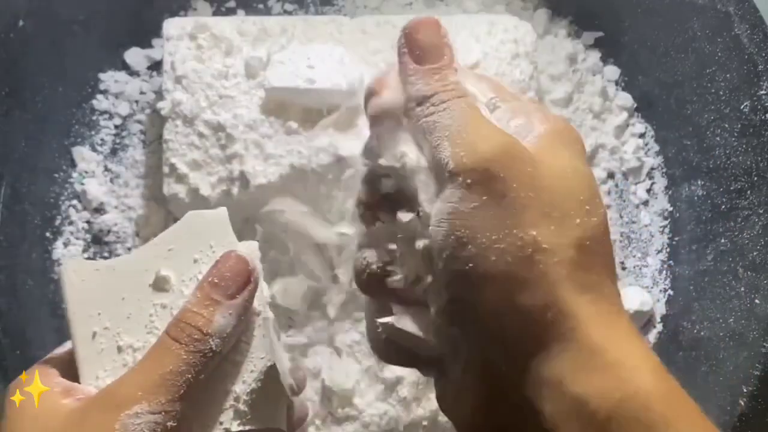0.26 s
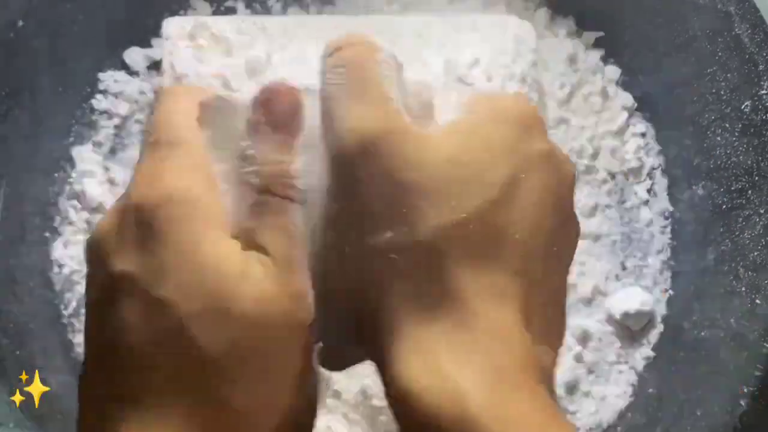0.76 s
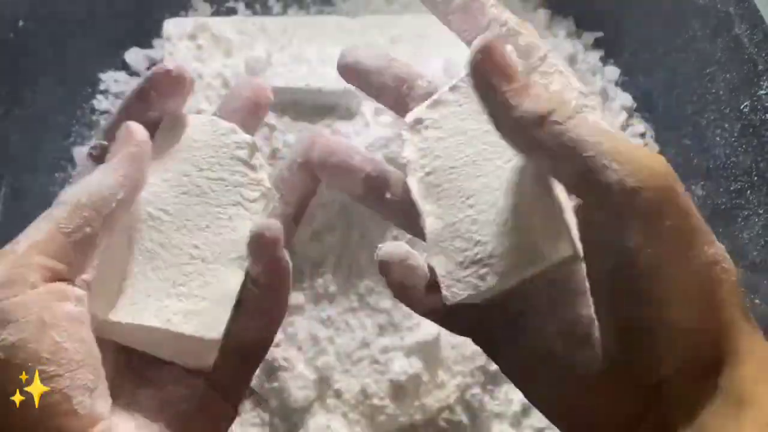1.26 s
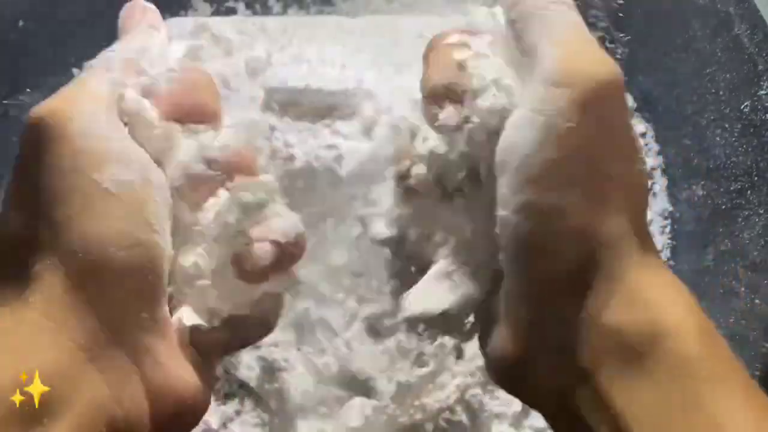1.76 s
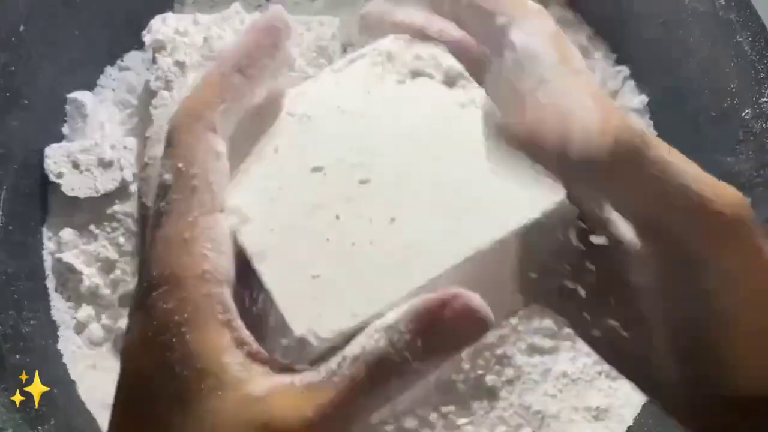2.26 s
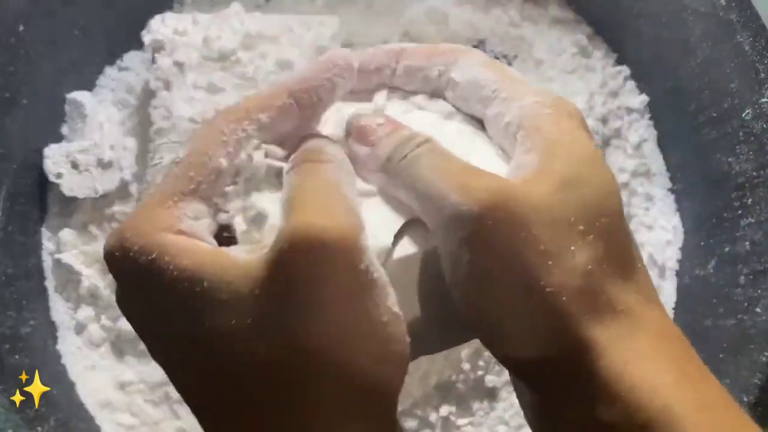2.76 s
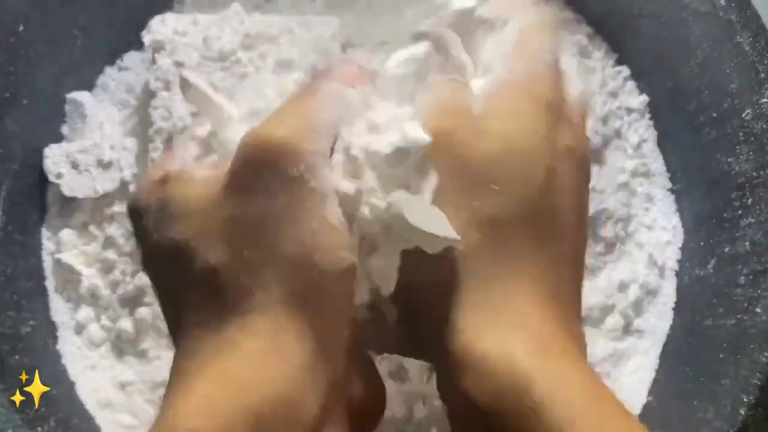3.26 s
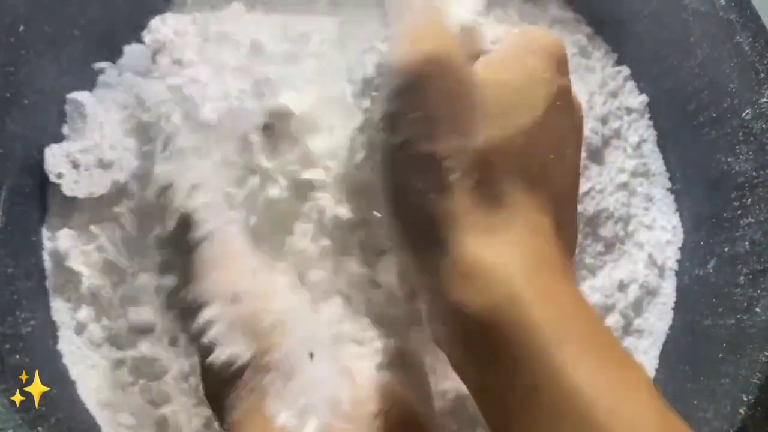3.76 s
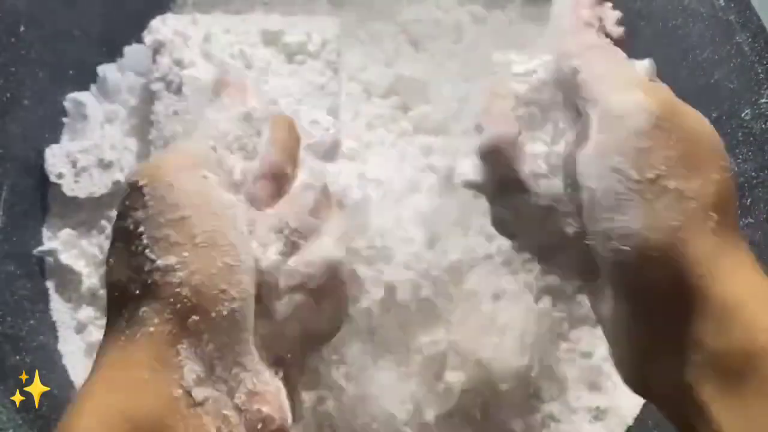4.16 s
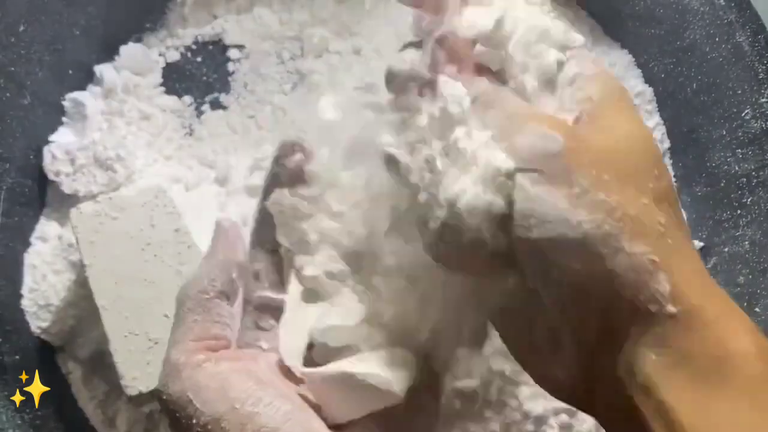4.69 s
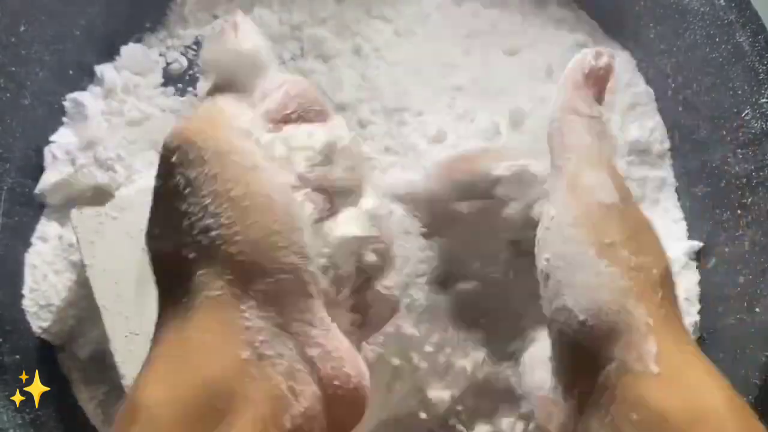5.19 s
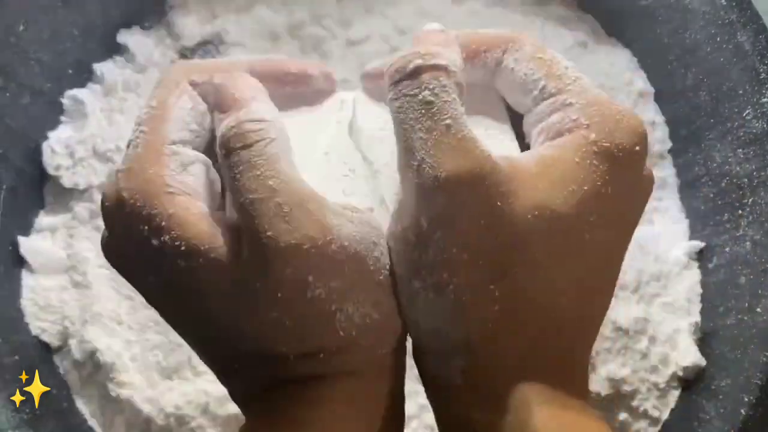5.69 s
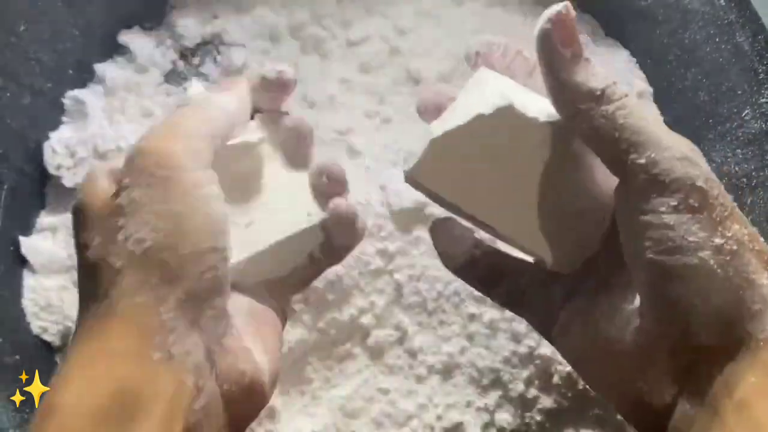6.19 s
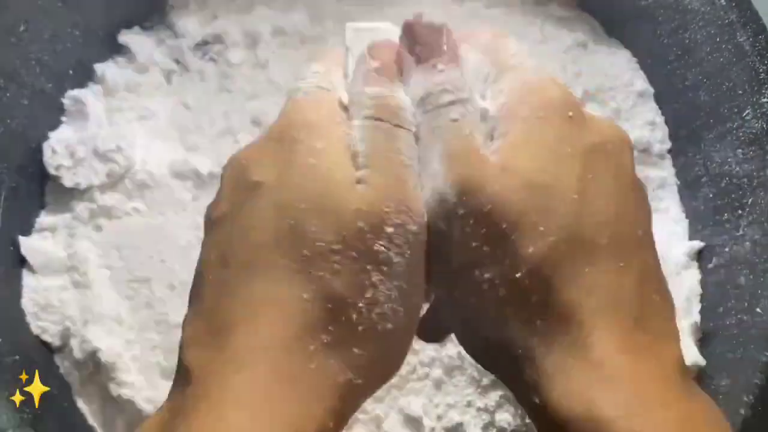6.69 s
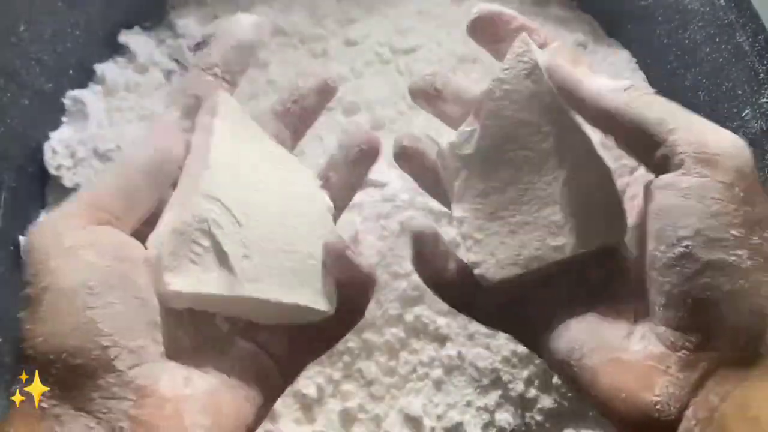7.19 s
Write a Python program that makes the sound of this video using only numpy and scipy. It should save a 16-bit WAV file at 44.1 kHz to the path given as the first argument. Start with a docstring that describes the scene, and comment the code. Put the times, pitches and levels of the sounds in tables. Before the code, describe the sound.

Soft chalk blocks snap with dull knocks and dry cracks in hands, crumbling into hissing powder, close up, with a low room rumble beneath.

```python
"""Hands snap soft chalk blocks and crush them to powder over a tub, close to a phone microphone.
Each fracture is a dull knock of the piece plus a short dry crack; between them crumbs tick, powder hisses down
and dusty skin rubs on chalk. A low room rumble lies under it; the loudest snaps overload the input."""
import sys
import numpy as np
from scipy import signal
from scipy.fft import rfft, irfft, next_fast_len
from scipy.io import wavfile
from scipy.ndimage import uniform_filter1d, map_coordinates

SR = 44100
rng = np.random.default_rng(int(sys.argv[2]) if len(sys.argv) > 2 else 0)


def unload_audio(sound):
    """Save the sound as a 16-bit wav file, at the path given as the first command line argument."""
    columns = np.transpose(np.atleast_2d(sound))
    # keep every value between -1 and 1, then stretch to whole-number steps
    steps = np.round(np.clip(columns, -1, 1) * 32767)
    wavfile.write(sys.argv[1], SR, steps.astype(np.int16))


N = 328104

# the louder fractures: (s, knock dB, knock pitch Hz, second mode Hz, knock t60 s, crack dB, chip pitch Hz, crack treble dB)
SNAPS = [(.0344, -29, 1050, 664, 0.0097, -37, 6800, -36), (0.0566, -26, 3110, 820, 0.032, -13, 2880, -15), (0.1163, -18.5, 325, 2800, 0.0079, -20.5, 2920, -19.5),
         (0.157, -19.5, 880, 1940, 0.0098, -26.5, 2700, -27), (.2043, -20, 529, 930, 0.0068, -30, 5720, -27.5),
         (0.2293, -9, 703, 384, 0.012, -41, 3010, -33), (.242, -14.5, 1720, 1340, 0.008, -29, 2660, -45),
         (.2763, -55, 840, 2400, .02, -32, 2390, -39.5), (.3573, -51, 514, 1850, .02, -38, 3180, -57),
         (.3737, -33.5, 520, 330, 0.013, -36.5, 3160, -60), (.4634, -46, 825, 1210, .012, -36, 6400, -40), (0.339, -28.5, 540, 730, 0.029, -51, 2370, -59), (.4122, -32.5, 825, 332, .02, -31.5, 2230, -37),
         (0.486, -24, 2960, 400, 0.034, -11, 3000, -30), (0.58, -23, 1180, 1730, 0.022, -31, 2920, -50.5),
         (0.5932, -18, 1190, 624, 0.012, -32, 3060, -44.5), (.5977, -17, 308, 1120, .015, -49, 3420, -41.5),
         (0.6893, -23, 1050, 520, 0.018, -40, 2720, -56), (0.7633, 8, 450, 1983, 0.0055, -8.5, 3820, -6.5),
         (1.3335, -48, 335, 590, .02, -49, 2830, -62), (1.3966, -58, 330, 724, .02, -41, 5300, -40),
         (1.4111, -16.5, 572, 990, 0.0091, -22, 3930, -24.5),
         (1.444, -13, 557, 338, 0.012, -26, 2520, -18.5), (1.4531, -36, 510, 2650, 0.032, -27, 4550, -19.5),
         (1.4754, -21, 552, 2520, 0.0097, -19, 2600, -25), (1.5183, -8, 2320, 860, 0.00355, -12, 2810, -19),
         (1.5362, -20.5, 2420, 1150, .01, -28, 2410, -27), (1.56, -40, 567, 1240, 0.019, -19, 5700, -27),
         (1.5964, -20, 568, 870, 0.011, -37, 2420, -38), (1.6756, -41, 1840, 1220, 0.018, -37, 2370, -32.5),
         (1.6927, -41, 2560, 790, .016, -29.5, 2420, -43.5), (1.7233, -30.5, 550, 860, 0.023, -45, 2980, -44), (1.745, -52, 330, 2660, .02, -39, 2730, -49),
         (1.803, -28, 1990, 840, .008, -39, 2370, -39),
         (1.8176, -23, 770, 530, 0.012, -52, 2290, -45), (1.8766, -13, 1230, 486, 0.016, -18, 2050, -25.5),
         (1.8964, -26, 960, 510, 0.0097, -35, 3420, -47), (2.0182, -31, 860, 1290, 0.011, -35, 2330, -47),
         (1.9466, -28, 540, 1040, 0.017, -39, 6660, -35.5), (1.993, -36, 580, 330, .019, -35.5, 2970, -32),
         (2.0005, -30, 1580, 2520, 0.019, -37, 2750, -48),
         (2.0598, -6.5, 2400, 1710, 0.0034, -22, 2400, -34), (2.0797, -18, 1410, 2460, .006, -30, 2740, -51.5),
         (2.0864, 4, 1150, 1700, .011, -9, 2500, -17), (2.0953, -9, 1100, 1900, .009, -19, 2270, -30.5),  # fixed
         (2.1736, -50, 3000, 1493, 0.0183, -36, 2954, -40.5), (2.4563, -46, 2680, 330, 0.0268, -34, 4340, -40),
         (2.536, -28, 336, 590, 0.0077, -41, 2620, -37), (2.602, -46, 333, 2220, 0.032, -44, 3250, -49),
         (2.66, -35.5, 890, 2420, 0.035, -25.5, 3420, -24.5),
         (2.8073, -15, 2100, 590, 0.0035, -33, 2380, -28), (2.8208, -27, 576, 2850, 0.022, -30, 3040, -33),
         (2.8314, -26.5, 550, 760, 0.023, -30.5, 2450, -37), (2.9278, -25, 330, 2450, 0.0065, -32, 7000, -24.5),
         (2.9398, -22.5, 1040, 520, 0.015, -40, 2640, -50), (2.994, -28.5, 2830, 564, 0.017, -35, 3020, -38),
         (3.026, -22.5, 620, 1150, 0.013, -30, 2300, -38), (3.0815, -25.5, 680, 430, 0.015, -37, 3000, -31.5),
         (3.1146, -37, 1660, 330, .015, -36, 2910, -36.5),
         (3.1548, -19.5, 1004, 440, 0.023, -27, 4500, -32), (3.1745, -25, 563, 330, 0.016, -37, 2570, -34),
         (3.2669, -22.5, 527, 1220, 0.017, -22.5, 4570, -38), (3.202, -34, 1150, 380, .02, -46, 3000, -54), (3.2434, -35, 1070, 710, 0.018, -50, 2980, -57),
         (3.304, -27.5, 1130, 580, .014, -42, 3090, -54),
         (3.383, -18.5, 2830, 330, 0.0034, -29, 3740, -48),
         (3.405, -22, 1590, 2670, 0.012, -35, 2400, -52), (3.4332, -32, 540, 1260, 0.028, -36, 3370, -50),
         (3.4244, -48, 620, 2650, 0.018, -31.5, 3540, -46), (3.4427, -30.5, 420, 2600, 0.037, -39, 2870, -46),
         (3.4866, -50, 840, 590, .02, -36, 3500, -55),
         (3.5329, -10, 1420, 474, 0.011, -29, 2870, -33), (3.5424, -19.5, 460, 780, 0.018, -31.5, 2310, -34),
         (3.575, -29, 940, 1500, .018, -24.5, 2860, -47), (3.5821, -17, 1040, 615, 0.011, -38, 2590, -44.5),
         (3.6035, -7, 820, 604, 0.0073, -30, 3020, -44), (3.6542, -26, 566, 330, 0.04, -33, 2620, -41),
         (3.686, -51, 440, 930, .017, -34, 7460, -32),
         (3.6934, -23, 362, 1300, .009, -37, 2520, -54), (3.7649, -23.5, 430, 2600, 0.013, -37, 2330, -44),
         (3.778, -19, 645, 344, 0.014, -25, 2700, -36), (3.8058, -23, 800, 1130, 0.014, -30, 2260, -53),
         (3.8603, -21.5, 1510, 553, 0.0082, -35, 3070, -56), (4.0158, -30, 327, 810, 0.012, -46, 4030, -62),
         (4.2314, -20, 570, 320, 0.014, -19.5, 4060, -25),
         (4.243, -22, 570, 760, 0.022, -20.5, 3080, -17), (4.3504, -14, 1160, 615, 0.014, -18, 2530, -35),
         (4.3744, -18.5, 564, 760, 0.015, -25.5, 3030, -30), (4.4427, -34, 870, 600, 0.01, -36, 2990, -49), (4.465, -53, 1440, 2280, .02, -31.5, 5060, -44),
         (4.5295, -36.5, 328, 2990, 0.033, -37, 2930, -48), (4.5883, -38, 820, 330, 0.016, -40.5, 3620, -65),
         (4.677, -23, 860, 1300, 0.0095, -37, 2360, -58),
         (4.7068, -28, 756, 1380, 0.014, -31.5, 3280, -42), (4.724, -27, 330, 1000, 0.0055, -35, 3330, -46),
         (4.8212, -57, 330, 590, 0.018, -26, 5120, -34), (4.856, -44, 3200, 1690, 0.026, -31, 3350, -53),
         (4.8932, -37, 1530, 330, 0.025, -40, 2270, -58), (4.9356, -35, 328, 796, 0.021, -41, 3900, -51.5), (5.01, -35, 580, 1440, 0.033, -37, 2760, -42),
         (5.019, -38, 330, 530, 0.0091, -28, 4800, -28.5),
         (5.0482, -25, 1100, 354, 0.008, -26.5, 4500, -38), (5.0672, -38, 570, 830, 0.034, -34, 6200, -33),
         (5.1658, -36, 570, 330, 0.0074, -39.5, 4170, -57),
         (5.2335, -52, 335, 3040, 0.017, -31, 5060, -47), (5.2412, 6.5, 1244, 810, 0.0075, -49, 2770, -25.5),
         (5.2493, -16.5, 606, 880, 0.017, -51, 2480, -54), (5.26, -42.5, 790, 1910, 0.02094, -34, 5090, -40),
         (5.2628, -26, 800, 1860, 0.015, -18, 2500, -30.5),
         (5.306, -20, 1390, 730, 0.0068, -30, 3760, -39), (5.3579, -28.5, 329.8, 667, 0.012, -37.5, 4400, -43),
         (5.3924, -38, 975, 650, .014, -52, 2220, -62),
         (5.6776, -9, 313, 528.6, 0.0082, -17, 6200, -14), (6.1108, -35.5, 510.1, 330, .03, -35.5, 3810, -34.5),
         (6.217, -36, 560, 2560, 0.017, -39, 2340, -55), (6.2578, -39, 327, 650, 0.019, -40, 4580, -52),
         (6.3429, -42, 332, 640, 0.028, -41, 3860, -54), (6.3872, -42, 328, 756, 0.016, -44, 3200, -63),
         (6.463, -50, 485, 1160, .02, -37.5, 4010, -55),
         (6.4754, -31, 335.5, 530, 0.017, -32.5, 4570, -35), (6.5192, -32, 550, 820, .0084, -38.5, 6130, -44),
         (6.5536, -28, 1090, 720, .006, -44, 2440, -49), (6.6124, -35, 463, 820, .017, -46.5, 4500, -58),
         (6.5595, -25, 364.2, 1120, 0.0064, -40.5, 2400, -57), (6.8209, -15, 320, 2080, 0.0078, -28.5, 2240, -21),
         (7.1251, -27.5, 396, 1155, 0.013, -39, 3480, -35), (7.4127, -28.5, 582.9, 2770, 0.015, -23.5, 4405, -27.5)]
# hands at work: (s, crumbs dB, powder dB)
WORK = [(0, -62, -66), (.06, -52, -46.5), (.23, -43.5, -47), (.39, -49.5, -64.5), (.42, -50.5, -53), (.55, -44, -50.5), (.6, -32, -45), (.69, -53, -49.5), (.715, -58, -81),
        (.755, -79, -66.5), (.79, -48, -54.5), (.85, -48.5, -59.5), (.9, -61, -58.5), (1.16, -66, -67.5), (1.2, -68, -70), (1.38, -69.5, -69), (1.45, -48, -51.5), (1.53, -40.5, -45), (1.64, -48.5, -52.5), (1.86, -41.5, -48.5),
        (2.05, -40, -46), (2.18, -47, -54.5), (2.221, -70, -66.5), (2.49, -66.5, -67), (2.54, -57, -55), (2.63, -68, -63.5), (2.669, -47, -46.5), (2.71, -65, -63.5), (2.79, -58.5, -60.5),
        (2.82, -43.5, -50), (2.95, -57, -59), (3.01, -40.5, -47), (3.05, -50, -57.5), (3.155, -42, -46), (3.22, -43, -57), (3.38, -43.5, -51.5), (3.67, -42.5, -49), (3.89, -48, -56.5), (4.22, -53, -57),
        (4.32, -53, -54.5), (4.37, -41, -42.5), (4.57, -55, -59.5), (4.73, -47.5, -48), (4.96, -54, -61.5), (5.07, -47, -45), (5.12, -49, -56), (5.17, -53, -51), (5.2, -61.5, -62),
        (5.29, -49, -59.5), (5.41, -51.5, -56), (5.5, -69, -66), (5.64, -68.5, -72.5), (5.69, -59, -49), (5.75, -57, -59.5), (5.84, -68, -65),
        (6.09, -68.5, -65.5), (6.13, -61, -53.5), (6.19, -59, -58.5), (6.24, -54, -53), (6.3, -61, -59.5), (6.35, -55, -56), (6.42, -66, -64.5), (6.46, -50, -51), (6.51, -59, -68), (6.601, -53, -61), (6.68, -63, -73.5), (6.92, -65, -69), (7, -64, -67), (7.13, -60.5, -64.5), (7.18, -68, -70.5), (7.27, -70, -71.5), (7.33, -69, -70.5),
        (7.44, -50.5, -51.5)]
# dusty skin sliding on a block: (start s, length s, dB)
RUB = [(.86, .19, -61), (1.05, .16, -61), (.95, .09, -63), (1.1, .07, -63), (1.33, .07, -63)]  # palm sliding on a block: (start s, length s, dB)  # fixed
RUB_MODE = (3950, 260)  # air gap between palm and block: (Hz, width Hz)  # fixed
CRUMBS = [(150, -38), (400, 5), (800, 0.5), (1500, -6), (2500, -10), (5000, -26.5), (10000, -87)]  # (Hz, dB per Hz)
POWDER = [(800, -48), (2000, 1), (3000, -3.5), (4500, -2), (6500, -6.5), (8000, -21), (14000, -48)]  # (Hz, dB per Hz)
DUST = [(3000, -46.5), (6000, -6), (8500, 1), (10500, -0.5), (13000, 0.5), (15300, 0.5), (15600, -41), (17000, -96)]  # (Hz, dB per Hz)
CRACK = [(600, -5.5), (1800, -12), (3000, 4.5), (5000, 0), (6600, -5), (8500, -10.5), (16000, -53)]  # (Hz, dB per Hz)
CRACK_TOP = [(3000, -41.5), (6500, 0.5), (9000, -2), (12500, -0.5), (15200, 0.5), (15800, -20), (17000, -36)]  # (Hz, dB per Hz)
RUMBLE = [(12, -23.5), (22, -3), (35, -4.5), (52, 0), (64, -6.5), (80, -11), (100, -10), (125, -16), (200, -17.5), (250, -18.5), (350, -25.5), (520, -32), (1500, -57), (2000, -93)]  # (Hz, dB per Hz)
HISS = [(500, -15), (1500, -17.5), (4000, 0), (9000, -20), (15300, -2), (15600, -44.5)]  # (Hz, dB per Hz)
TUB = [(200, 0.34), (1000, 0.033), (3000, 0.03), (12000, 0.051)]  # (Hz, t60 s)
TOP_HZ = 16494  # fixed
# short scrapes of skin or chips on chalk, each with its own tone: (start s, length s, Hz, width Hz, level dB)
SCRAPES = [(0.835, 0.21, 10100, 9000, -54.5), (2.262, 0.054, 11000, 8150, -56.5), (5.452, 0.052, 11000, 8000, -55), (5.53, 0.042, 8000, 10000, -61.5), (4.52, .035, 8880, 9880, -57.5), (5.764, 0.053, 9500, 10900, -49.5),
           (6.938, 0.13, 10980, 7870, -54), (7.086, 0.072, 9890, 10000, -55), (0.757, 0.079, 1920, 700, -47), (.81, 0.086, 1900, 600, -56.5), (1.025, 0.19, 7870, 7040, -57), (1.046, 0.097, 6550, 275, -68), (1.004, 0.038, 6650, 800, -55), (0.98, 0.12, 2220, 600, -81),
           (1.11, 0.11, 2130, 181, -69), (2.26, 0.051, 4460, 2300, -52.5), (4.535, 0.017, 6440, 500, -53), (4.787, 0.018, 3520, 150, -45),
           (5.445, 0.065, 4660, 1205, -55), (5.766, 0.051, 2340, 700, -56.5), (5.857, .06, 4935, 1505, -61.5), (5.971, 0.034, 5010, 2590, -62), (6.21, 0.024, 4370, 3950, -50), (6.944, 0.11, 5200, 4500, -55),
           (7.065, 0.08, 4500, 3000, -55.5), (7.175, 0.0355, 4300, 1190, -65), (7.224, .08, 4002, 690, -71)]
BODY = [(200, -27), (500, -3), (900, -2), (1600, -7), (2400, -9.5), (3500, -23.5), (8000, -50)]  # crushed chalk: (Hz, dB per Hz)
PORT = (6600, 630, 2.5)  # resonance of the microphone port: (Hz, width Hz, dB)
CRUSH_DB, CHIP_DB, CRACK_T60 = -5.5, 2.5, 0.0093  # crushed edge re knock, chip re crack, decay of a crack s
# small fractures at random: level re crumbs and re powder dB, size spread dB, pitch centre Hz and spread in octaves
SMALL_KNOCK_DB, SMALL_CRACK_DB, SMALL_TREBLE_DB, SMALL_SPREAD_DB = 4.5, 5.5, -7, 2
SMALL_HZ, SMALL_OCTAVES, SMALL_CHIP_HZ, SMALL_T60 = 703, .7, 3300, 0.01
BUSY_DB = -59  # fixed; crumbs level under which the hands only hold the chalk and nothing breaks
DUST_DB, DUST_FOLLOWS, POWDER_MID_DB = -57.5, .65, -49  # dust at a middle powder level, and dB of dust per dB of powder
DEBRIS_DB, SPRAY_DB, DEBRIS_T60 = -51.5, -45, 0.12  # after a middle fracture: crumbs dB, powder dB, decay s
RUMBLE_DB, RUMBLE_SWAY_DB = -35, 1.9  # level and its slow wander
MID_SNAP_DB, DEBRIS_GROWS = -22.5, 0.51  # a middle fracture, and dB of debris per dB of fracture
THUD_DB, THUD_HZ, THUD_T60, THUD_FADES = -19, 152.2, 0.01, 0  # the jolt in the palms: re knock, pitch, s, dB per octave of knock pitch over it
CRUSH_FOLLOWS, FAINT_LASTS = 0.22, 0.064  # dB of crush per dB of crack over knock; dB of longer decay per dB of fainter crack
CREAK, CREAK_S = .08, .002  # the crackle before a fracture: size re crack, growth time s  # fixed
CREAK_FADES = 0.66  # dB less creak per dB of crack: clean breaks give no warning
SMALL_TOP_DB = -29  # no lesser fracture knocks or cracks louder  # fixed


def amp(db):
    """Gain of a level in dB."""
    return 10 ** (np.asarray(db) / 20)


def unit(x):
    """x at rms 1."""
    return x / np.sqrt(np.mean(x ** 2) + 1e-20)


def along(points, hz):
    """(Hz, value) points on a log axis."""
    f, v = np.transpose(points)
    return np.interp(np.log(hz + 1), np.log(f + 1), v)


def curves(rows):
    """One value per sample for each column after the time."""
    s, *cols = np.transpose(rows)
    return [np.interp(np.arange(N) / SR, s, c) for c in cols]


def wobble(rate):
    """A smooth random curve, rate knots a second."""
    return map_coordinates(rng.standard_normal(int(N * rate / SR) + 4), [np.arange(N) * rate / SR])


def filtered(x, response):
    """x times a response of frequency."""
    m = next_fast_len(N + SR // 2)
    return irfft(rfft(x, m) * response(np.fft.rfftfreq(m, 1 / SR)), m)[..., :N]


def coloured(x, spectrum):
    """x through a (Hz, dB) colour that keeps the power of white noise."""
    grid = amp(along(spectrum, np.linspace(0, SR / 2, num=4096)))
    return filtered(x, lambda hz: amp(along(spectrum, hz))) / np.sqrt(np.mean(grid ** 2))


def laid(starts, shapes):
    """Sum of the rows of shapes, each from its start time."""
    at = np.round(starts * SR).astype(int)[:, None] + np.arange(shapes.shape[1])
    return np.bincount(at.ravel(), shapes.ravel(), N + shapes.shape[1])[:N]


def grit(count, spread_db, t60, share):
    """Noise with tiny bursts on it: a few grains are much larger than the rest. rms 1."""
    draw = rng.random((count, 2))
    t = np.arange(256) / SR
    size = amp(-spread_db * np.log(1 - .999 * draw[:, 1:]))
    bursts = laid(draw[:, 0] * N / SR, size * amp(-60 * t / t60) * rng.standard_normal((count, len(t))))
    share = np.clip(share, 0, 1)
    return np.sqrt(share) * unit(bursts) + np.sqrt(1 - share) * rng.standard_normal(N)


def snaps():
    """A fracture knocks two modes of the piece, crushes its edge and sprays a dry crack in which one chip rings."""
    s, knock_db, hz, second_hz, knock_t60, crack_db, chip_hz, top_db = np.vstack([SNAPS, small_snaps(count=300)]).T[:, :, None]
    lead = 256 / SR  # fixed
    t = np.arange(2048) / SR - lead
    after = np.maximum(t, 0)
    knock_t60 = np.clip(knock_t60, .004, .03)  # fixed
    crack_t60 = np.clip(CRACK_T60 * amp(FAINT_LASTS * (MID_SNAP_DB - crack_db)), .003, .04)
    ring = np.sin(2 * np.pi * hz * after) + 0.62 * np.sin(2 * np.pi * second_hz * after)
    ring += 0.17 * np.sin(2 * np.pi * np.sqrt(hz * second_hz) * after)  # a weaker mode between them fills the body
    push = (1 - np.exp(-after / 0.00033)) * amp(-60 * (after / knock_t60) ** 1.164)  # the hand damps the piece ever faster
    knock = amp(knock_db) * push
    creak = CREAK * amp(np.minimum(CREAK_FADES * (MID_SNAP_DB - crack_db), 6)) * np.exp(np.minimum(t, 0) / CREAK_S) * (t < 0)  # the flaw creaks before it runs
    burst = creak + (1 - np.exp(-after / 0.00044)) * amp(-60 * after / crack_t60)
    noise = rng.standard_normal((len(s), 3, len(t))).transpose(1, 0, 2)
    click = 1.54 * np.exp(-((t - .0003) * SR) ** 2)  # the instant the piece parts
    chip = amp(crack_db + CHIP_DB) * burst * np.sin(2 * np.pi * chip_hz * after)
    thud = amp(knock_db + THUD_DB + THUD_FADES * np.log2(hz / THUD_HZ) - 60 * after / THUD_T60) * np.sin(2 * np.pi * THUD_HZ * after)
    s = s[:, 0] - lead
    crush = coloured(laid(s, amp(CRUSH_DB + CRUSH_FOLLOWS * (crack_db - knock_db)) * knock * noise[2]), BODY)
    crack = coloured(laid(s, amp(crack_db) * (burst * noise[0] + click)), CRACK)
    top = coloured(laid(s, amp(top_db) * burst * noise[1]), CRACK_TOP)
    return crush + laid(s, chip - knock * ring - thud) + crack + top


def crumbling():
    """Crumbs tick and roll, powder pours, dust hisses; the grip pulses and drives all three together."""
    crumbs_db, powder_db = curves(WORK)
    rolling = np.hypot(amp(crumbs_db), debris(column=1, db=DEBRIS_DB))
    pouring = np.hypot(amp(powder_db), debris(column=5, db=SPRAY_DB))
    rising = amp(DUST_DB) * (pouring / amp(POWDER_MID_DB)) ** DUST_FOLLOWS
    grip = 0.98 * wobble(30) + 2.0 * wobble(80)
    grains = grit(count=5500, spread_db=4.0, t60=0.0014, share=0.45)  # the same grains break in every band
    crumbs = coloured(0.63 * grains + 0.75 * grit(count=2500, spread_db=8.0, t60=0.01, share=.7), CRUMBS)
    powder = coloured(patchy(grains, depth_db=2.5), POWDER)
    crumbs = 0.73 * crumbs + 0.5 * chips(count=1500, centre_hz=1290, octaves=.45, cycles=1.0, spread_db=1.5)
    powder = 0.64 * powder + .5 * chips(count=2500, centre_hz=3880, octaves=0.28, cycles=3.5, spread_db=2.0)
    dust = coloured(patchy(.5 * grains + 0.93 * rng.standard_normal(N), depth_db=1.5), DUST)  # fixed
    return amp(grip) * (rolling * crumbs + pouring * powder + rising * dust)


def rubbing():
    """Friction noise through narrow resonances: a long slide of the palm and short scrapes."""
    tone = unit(filtered(rng.standard_normal(N), resonance(*RUB_MODE)))
    level = np.zeros(N)
    for s, length, db in RUB:
        level[round(s * SR):][:round(length * SR)] += amp(db) * signal.windows.tukey(round(length * SR), .5)
    out = level * amp(1.9 * wobble(40)) * tone
    grainy = grit(count=6000, spread_db=1.5, t60=0.0046, share=.2)
    for s, length, hz, width, db in SCRAPES:
        piece = grainy[round(s * SR):][:round(length * SR)]
        band = signal.sosfilt(signal.butter(2, [hz - width / 2, hz + width / 2], "band", fs=SR, output="sos"), piece)  # fixed
        out[round(s * SR):][:len(piece)] += amp(db) * unit(band) * signal.windows.tukey(len(piece), .6)
    return out


def room_floor():
    """Low rumble of the room and the hiss of the microphone."""
    rumble = amp(RUMBLE_DB + RUMBLE_SWAY_DB * wobble(2.6)) * coloured(rng.standard_normal(N), RUMBLE)
    return rumble + amp(-83) * coloured(rng.standard_normal(N), HISS)


def tub(x):
    """The tub and the near walls answer; each frequency dies at its own speed."""
    hz, t, z = signal.stft(rng.standard_normal(SR // 4), SR, nperseg=128)
    tail = signal.istft(z * amp(-60 * t / along(TUB, hz)[:, None]), SR, nperseg=128)[1]
    return signal.fftconvolve(np.pad(x, (150, 0)), tail / np.linalg.norm(tail))[:N]


def resonance(hz, width):
    """Response of one mode, 1 at its centre."""
    return lambda f: 1j * f * width / (hz ** 2 - f * f + 1j * f * width)


def patchy(x, depth_db):
    """x with random louder and softer patches in time and frequency."""
    z = signal.stft(x, nperseg=256)[2]
    field = uniform_filter1d(uniform_filter1d(rng.standard_normal(z.shape), size=6, axis=0), size=8, axis=1)
    return signal.istft(z * amp(depth_db * unit(field)), nperseg=256)[1][:N]


def chips(count, centre_hz, octaves, cycles, spread_db):
    """Loose fragments that click together, each ringing for a few cycles at its own pitch. rms 1."""
    draw = rng.random((count, 2))
    hz = centre_hz * 2 ** (octaves * np.clip(rng.standard_normal((count, 1)), -2, 2))
    turns = hz * np.arange(400) / SR
    size = amp(-spread_db * np.log(1 - .998 * draw[:, 1:]))
    return unit(laid(draw[:, 0] * N / SR, size * np.exp(-turns / cycles) * np.sin(2 * np.pi * turns)))


def small_snaps(count):
    """Rows like SNAPS for the lesser fractures, which come at random while the hands are busy."""
    s = rng.random((count, 2))
    g = np.clip(rng.standard_normal((count, 5)), -2, 2)
    t, crumbs_db, powder_db = np.transpose(WORK)
    when = s[:, 0] * (N / SR - .05)  # fixed
    size_db = -SMALL_SPREAD_DB * np.log(1 - .93 * s[:, 1])  # fixed
    idle_db = 6 * np.minimum(np.interp(when, t, crumbs_db) - BUSY_DB, 0)  # fixed
    knock = np.interp(when, t, crumbs_db) + SMALL_KNOCK_DB + idle_db + size_db + 2.3 * g[:, 0]
    crack = np.interp(when, t, powder_db) + SMALL_CRACK_DB + idle_db + size_db
    knock, crack = np.minimum(knock, SMALL_TOP_DB), np.minimum(crack, SMALL_TOP_DB)
    hz, second = SMALL_HZ * 2 ** (SMALL_OCTAVES * g[:, 1:3].T)
    return np.c_[when, knock, hz, second, np.full(count, SMALL_T60), crack, SMALL_CHIP_HZ * 2 ** (.3 * g[:, 3]),
                 crack + SMALL_TREBLE_DB + 4 * g[:, 4]]


def debris(column, db):
    """Level of the loose bits that every louder fracture sheds."""
    rows = np.array(SNAPS)
    t = np.arange(SR // 4) / SR
    shed_db = db + DEBRIS_GROWS * (rows[:, [column]] - MID_SNAP_DB)
    return np.sqrt(laid(rows[:, 0], amp(shed_db - 60 * t / DEBRIS_T60) ** 2))


def scene():
    """All sources at one microphone."""
    breaks = snaps()
    return (breaks + amp(-20.5) * tub(breaks) + crumbling() + rubbing() + room_floor())[None]


def record(dry):
    """The microphone port lifts one band; the input saturates at full scale and keeps nothing above its band limit."""
    hz, width, db = PORT
    heard = filtered(dry, lambda f: 1 + (amp(db) - 1) * resonance(hz, width)(f))
    clipped = heard / (1 + np.abs(heard) ** 8) ** (1 / 8)  # fixed
    return filtered(clipped, lambda f: f < TOP_HZ)


dry = scene()
out = record(dry)
unload_audio(out)
```